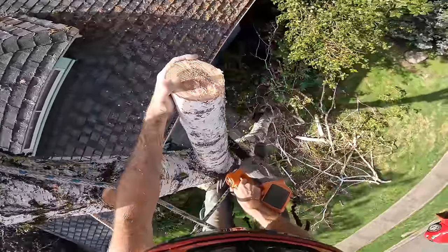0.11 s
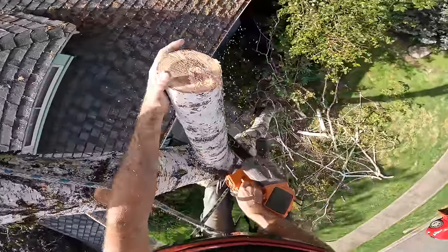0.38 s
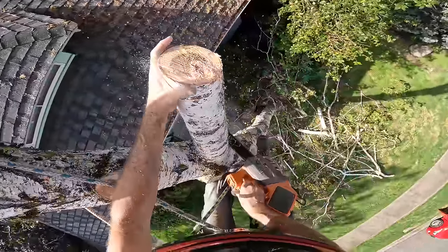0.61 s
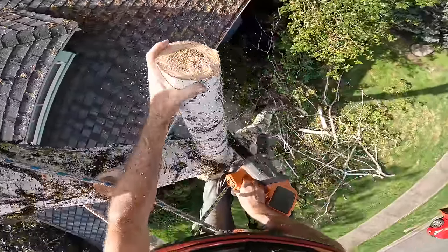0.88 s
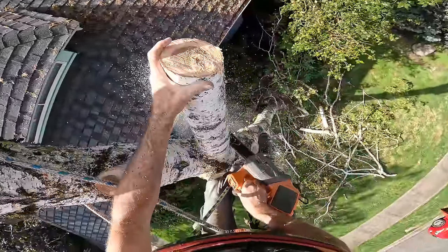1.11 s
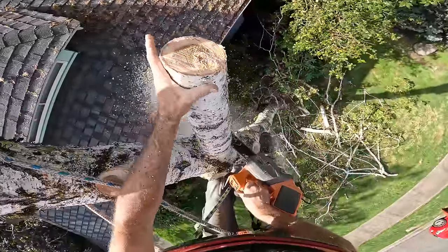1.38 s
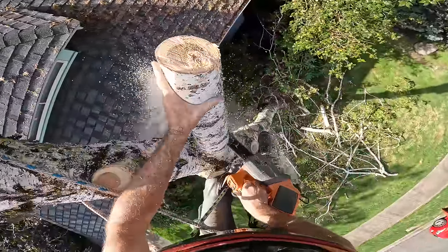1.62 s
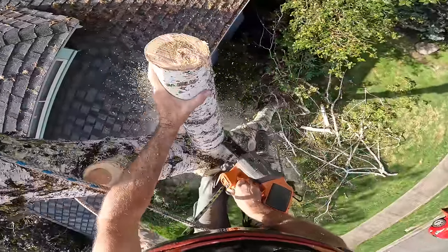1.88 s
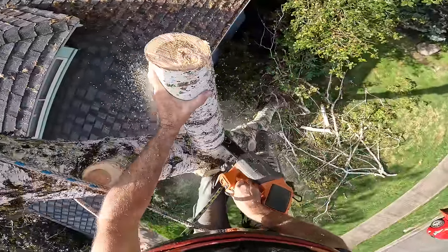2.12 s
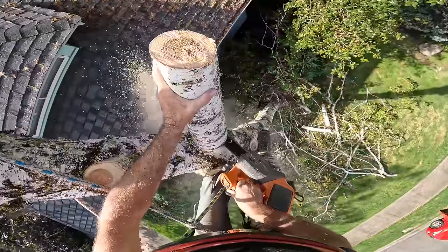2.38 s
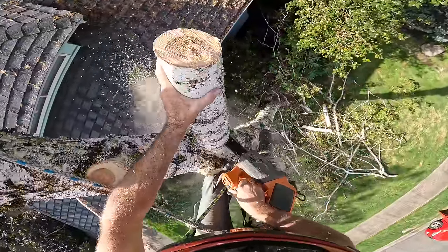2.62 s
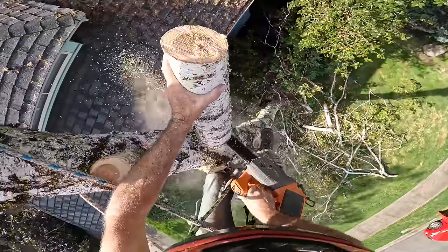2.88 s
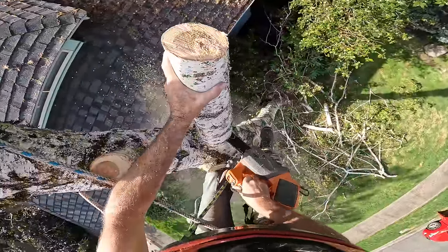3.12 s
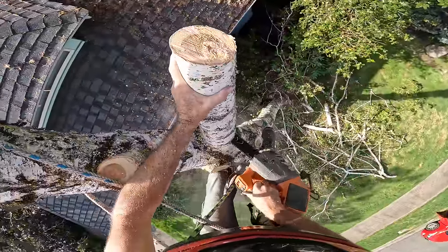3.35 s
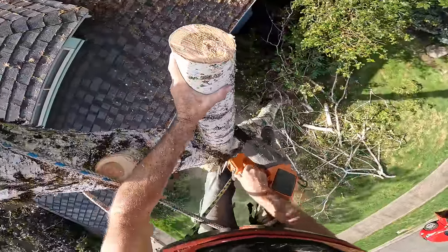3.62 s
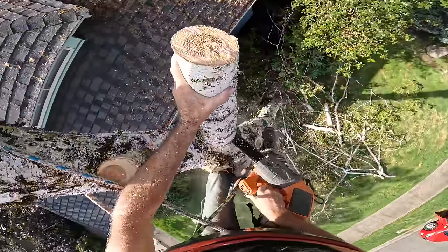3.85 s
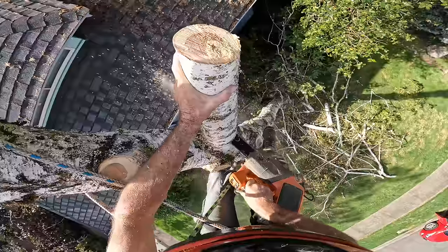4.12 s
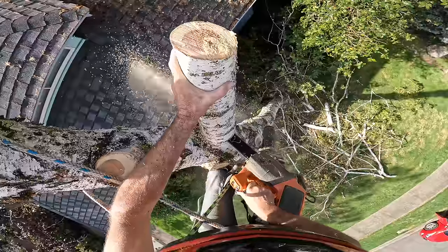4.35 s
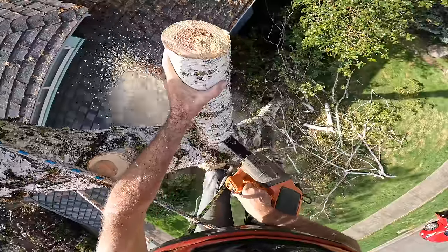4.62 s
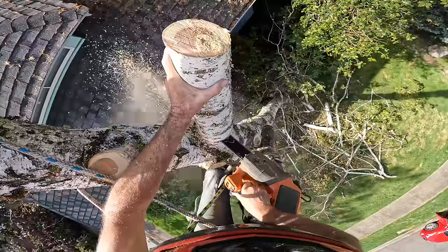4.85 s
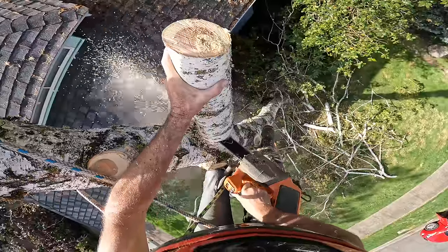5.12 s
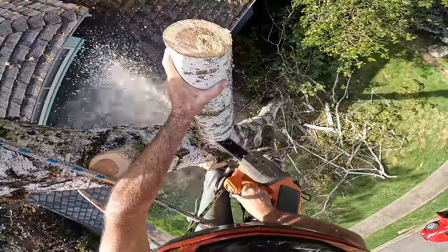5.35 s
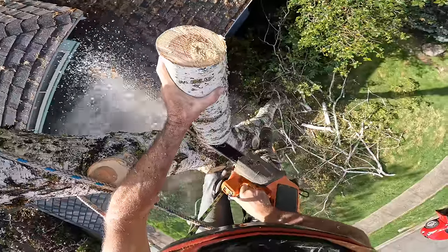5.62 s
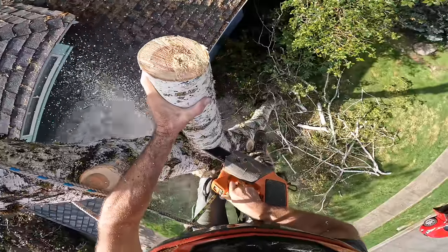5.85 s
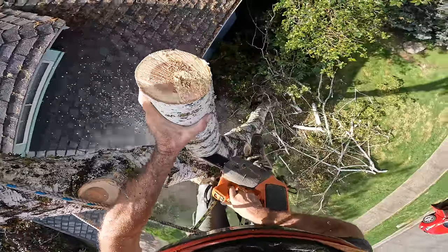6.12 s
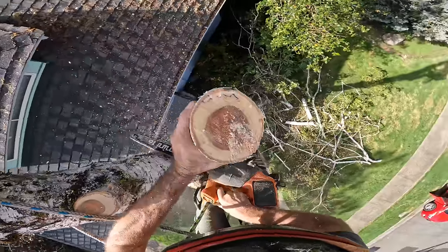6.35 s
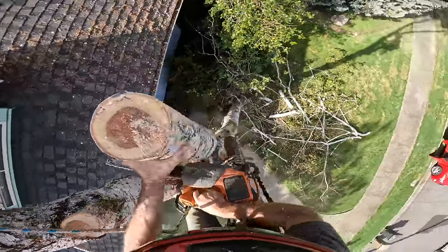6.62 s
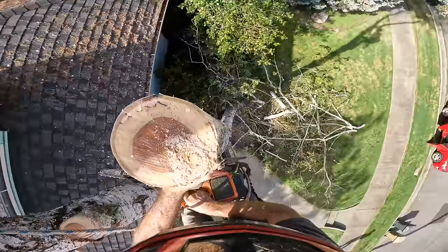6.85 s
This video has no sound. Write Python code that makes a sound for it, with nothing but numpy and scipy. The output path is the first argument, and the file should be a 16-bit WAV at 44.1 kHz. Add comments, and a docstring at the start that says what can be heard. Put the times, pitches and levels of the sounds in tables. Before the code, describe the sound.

Close electric saw surges through wood with a gritty high whine, pauses amid small gear clicks, cuts again, then spins free and winds down.

```python
"""A battery chainsaw, an arm's length below a head-worn camera, makes two cuts in a tree stem, then revs
almost free and coasts down. Shaft-order sines whine through the saw's housing; noise bursts, one per
sprocket tooth, become roar, rattle, bite and hiss. Slow swells of low noise buffet the microphone ports,
short dying noises are gear ticking in the pauses, and steady coloured noise is the hum of distant traffic."""
import sys
import numpy as np
from scipy import signal
from scipy.fft import rfft, irfft, next_fast_len
from scipy.io import wavfile
from scipy.ndimage import uniform_filter1d, map_coordinates

SR = 44100
rng = np.random.default_rng(int(sys.argv[2]) if len(sys.argv) > 2 else 0)


def volts_from_db(level):
    """Convert decibel levels to linear amplitude ratios."""
    exponent = np.asarray(level, float) / 20
    return 10 ** exponent


def put_to_file(sound):
    """Save the sound as 16-bit audio at rate SR, in the file named by the first command-line argument."""
    columns = np.atleast_2d(sound).T  # one column per channel
    safe = np.clip(columns, -1, 1)
    whole_steps = np.round(safe * 32767)
    wavfile.write(sys.argv[1], SR, whole_steps.astype(np.int16))


N = 307818
TEETH = 8  # on the sprocket

# how the saw and gear noises are shared between the two ports: f/Hz, likeness (1 = the same in both, 0 =
# unrelated)
STEREO_LIKENESS = [(300, 0.97), (700, 0.98), (2000, 0.995), (3200, 0.98), (3900, 1), (9500, 1), (10300, 1),
                   (12000, 0.1), (15000, 0)]


def unit(x):
    """Scaled to rms 1."""
    return x / np.sqrt(np.mean(x ** 2) + 1e-20)


def along(points, hz):
    """(Hz, value) points read on a log frequency axis."""
    f, v = np.transpose(points)
    return np.interp(np.log(hz + 1), np.log(f + 1), v)


def curves(rows):
    """One value per sample for each column after the time."""
    s, *cols = np.transpose(rows)
    return [np.interp(np.arange(N) / SR, s, c) for c in cols]


def wobble(rate):
    """A smooth random curve, rate knots a second."""
    knots = rng.standard_normal(int(N * rate / SR) + 4)
    return map_coordinates(knots, [np.arange(N) * rate / SR])


def filtered(x, response):
    """x times a response of frequency."""
    m = next_fast_len(N + 8192)
    return irfft(rfft(x, m) * response(np.fft.rfftfreq(m, 1 / SR)), m)[..., :N]


def closed(spectrum, hz):
    """Gain of a spectrum, silent a little outside its ends."""
    inside = (hz > .8 * spectrum[0][0]) * (hz < 1.2 * spectrum[-1][0])
    return volts_from_db(along(spectrum, hz)) * inside


def resonances(hz, modes, flat_db):
    """Gain of a set of resonances, their powers added over a weak flat path."""
    power = sum(volts_from_db(2 * db) / (1 + ((hz - c) / (w / 2)) ** 2) for c, w, db in modes)
    return np.sqrt(volts_from_db(2 * flat_db) + power)


def pair(source, gain, alike):
    """Two noises mixed to a stereo pair of rms 1 with the given likeness."""
    def mid_side_gain(hz):
        turn = np.arccos(np.clip(along(alike, hz), -1, 1)) / 2
        return gain(hz) * [np.cos(turn), np.sin(turn)]

    mid, side = filtered(source, mid_side_gain)
    return unit(np.array([mid + side, mid - side]))


def wind():
    """Turbulence makes lumpy low pressure on the ports, stronger on the right: a breeze with short puffs."""
    # breeze at the ports: t/s, relative level/dB
    breeze_rows = [(0, -30.5), (0.5, -50), (1.2, -34), (2.3, -41), (2.7, -44.5), (3.4, -42.5), (3.9, -28),
                   (4.3, -45), (5.3, -48), (6.1, -58), (6.7, -57), (6.98, -35)]
    # puffs on the ports: t/s, relative deep level/dB, relative flutter level/dB, time from peak to 1/e /s
    puff_rows = [(0.11, -24, -16.5, 0.018), (0.194, -32, -15.5, 0.023), (0.893, -20, -26, .015),
                 (0.99, -20, -28.5, 0.06), (1.125, -23, -45, 0.015), (1.26, -29, -40.5, 0.025),
                 (1.351, -31, -22, 0.063), (1.442, -37, -26, .02), (1.5, -23, -25.5, 0.017),
                 (1.773, -31, -41, 0.0302), (2.059, -23, -21.5, 0.027), (2.122, -30, -27, .02),
                 (2.19, -31, -45, 0.017), (2.255, -24, -26, 0.017), (2.392, -36, -38, 0.031),
                 (3.11, -31, -35, 0.016), (3.495, -31, -45, .02), (3.642, -33, -45, 0.01),
                 (3.731, -40, -31, 0.038), (3.857, -22, -33, 0.037)]
    # colour of the deep buffeting: f/Hz, relative level/dB
    deep_colour = [(20, 2), (32, 4.5), (60, -4), (90, -22)]
    # colour of the flutter: f/Hz, relative level/dB
    flutter_colour = [(45, -4), (75, 2.5), (110, 0), (180, -9.5), (300, -31)]

    t = np.arange(N) / SR
    breeze_db, = curves(breeze_rows)
    puffs = sum(volts_from_db([[deep_db], [flutter_db]]) * np.exp(-((t - s) / length) ** 2)
                for s, deep_db, flutter_db, length in puff_rows)
    deep = volts_from_db(breeze_db - 0.5 + 2.1 * wobble(14)) + 0.51 * puffs[0]
    # the flutter hardly follows the breeze
    flutter_db = 0.098 * (breeze_db - breeze_db.mean()) - 43.5 + 3.6 * wobble(14) + 0.58 * wobble(30)
    flutter = volts_from_db(flutter_db) + 0.74 * puffs[1]

    def gust(spectrum):
        noise = rng.standard_normal((2, N))
        return pair(noise, lambda hz: closed(spectrum, hz), [(30, 0.99), (200, 0.98)])

    return (deep * gust(deep_colour) + flutter * gust(flutter_colour)) * volts_from_db([[-2.7], [2.4]])


def street():
    """Far traffic, many sources blurred into one soft hum with a hump near 1 kHz."""
    # traffic in the distance: t/s, relative level/dB
    street_rows = [(0.0, -41), (0.17, -47.5), (0.3, -39.5), (3.04, -48), (3.18, -48.5), (3.75, -45),
                   (3.85, -37.5), (6.88, -45.5)]
    # colour of the traffic: f/Hz, relative level/dB
    traffic_colour = [(120, -15), (200, -1), (326, -8.5), (521, -8), (659, -11.5), (818, -12), (929, -3.5),
                      (2600, -27), (3410, -27), (4090, -26), (5660, -29.5), (12100, -47), (15000, -69)]

    level_db, = curves(street_rows)
    hum = pair(rng.standard_normal((2, N)), lambda hz: closed(traffic_colour, hz),
               [(300, 0.98), (2000, .97), (5000, 0.73), (12000, 0.23)])
    return volts_from_db(level_db + 3.5 + 0.23 * wobble(8.1)) * hum


def gear():
    """Ticks and scuffs of gear: each contact is a short dying noise in three colours."""
    # ticks: t/s, relative level of the click/dB, dull part over click/dB, bright part over click/dB
    tick_rows = [(0.043, -29, 13, 2), (0.0608, -20, 3, -10), (0.077, -26.5, -3, 7),
                 (0.1006, -36.5, -16.5, 8), (0.1663, -18, 10.5, -5), (0.2164, -21, 9, -7),
                 (0.2317, -16.5, 7, -15), (0.267, -23, 10, -11), (3.0974, -39, 10, -14),
                 (3.191, -33, 8, -7), (3.246, -31, 6, -8), (3.266, -18, 2, -2), (3.343, -26.5, -8, -6),
                 (3.361, -28, 1, -2), (3.459, -24.5, -5, -15), (3.6012, -37, 1, -4),
                 (3.662, -22.5, 6, -3.5), (3.7404, -38, 17, -16), (3.8062, -20, -7, -9),
                 (3.8307, -21.5, -12, -3), (3.845, -28, 2, 5), (6.933, -30, 4, -5.5)]
    # colours of the three parts: f/Hz, relative level/dB
    dull_colour = [(250, -15), (450, -1.5), (1100, -10.5), (1600, -11)]
    click_colour = [(1000, 5.5), (1600, -8.5), (3300, -2.5), (4500, -39)]
    bright_colour = [(3500, -4), (5200, 2), (8000, -10), (14000, -25)]
    t60_s, rise_s = 0.028, 0.0029

    t = np.arange(SR // 8) / SR
    shape = volts_from_db(-5 - 60 * t / t60_s) * (1 - np.exp(-t / rise_s))
    envelope = np.zeros((3, N + len(t)))
    for s, db, dull_db, bright_db in tick_rows:
        levels = volts_from_db([[db + dull_db], [db], [db + bright_db]])
        envelope[:, round(s * SR):][:, :len(t)] += levels * shape
    colours = [pair(rng.standard_normal((2, N)), lambda hz: closed(c, hz), STEREO_LIKENESS)
               for c in (dull_colour, click_colour, bright_colour)]
    return sum(e[:N] * c for e, c in zip(envelope, colours))


def speed():
    """Tooth rate: driven while the trigger is held, then slowed by drag and rubbing."""
    # chain drive, one list for each pull of the trigger: t/s, sprocket tooth rate f/Hz
    drive = [
        [(0.3, 278), (0.36, 521.7), (0.415, 911), (0.44, 1040), (0.47, 1107), (0.53, 968), (0.62, 644.6),
         (0.69, 548), (0.75, 652), (0.82, 865), (0.9, 923), (0.97, 992), (1.06, 809), (1.18, 917.6),
         (1.255, 924), (1.37, 1074), (1.425, 1209), (1.49, 1306), (1.575, 1114), (1.72, 889), (1.765, 895.5),
         (1.82, 802), (1.885, 970), (1.99, 1055), (2.105, 1312), (2.2, 1354), (2.35, 1504), (2.495, 1602),
         (2.58, 1603), (2.66, 1684), (2.72, 1662), (2.77, 1678), (2.79, 1608)],
        [(3.86, 251.3), (3.93, 733.5), (4.07, 1766), (4.1, 1630), (4.16, 1636), (4.24, 1452), (4.29, 1388),
         (4.345, 1460), (4.385, 1590), (4.465, 1499), (4.56, 1451), (4.675, 1303), (4.73, 1181), (4.81, 1088),
         (4.84, 1111), (4.94, 1248), (5.0, 1264), (5.055, 1337), (5.145, 1342), (5.225, 1399), (5.295, 1380),
         (5.375, 1406), (5.435, 1373), (5.515, 1401), (5.57, 1394), (5.615, 1453), (5.74, 1738), (5.795, 1437)],
        [(6.088, 635), (6.135, 1137), (6.19, 1614)],
    ]
    # trigger let go after each pull, the kerf braking harder than air: drag [1/s], rubbing [Hz/s]
    coast_rows = [(4.3, 1600), (2.02, 800), (1.85, 740)]
    rest_hz = 40  # lowest tooth rate

    t = np.arange(N) / SR
    tooth_hz = np.full(N, float(rest_hz))
    for rows, (drag, rub) in zip(drive, coast_rows):
        s, hz = np.transpose(rows)
        since_release = np.maximum(t - s[-1], 0)
        coast = (hz[-1] + rub / drag) * np.exp(-drag * since_release) - rub / drag
        after_start = np.where(t < s[-1], np.interp(t, s, hz), np.maximum(coast, rest_hz))
        tooth_hz = np.where(t < s[0], tooth_hz, after_start)
    return tooth_hz


def whine(tooth_hz, depth, loud_db):
    """Shaft orders as slightly unsteady lines that swell as they cross a resonance of the housing."""
    # multiples of the shaft rate that sound; order 8 is the tooth rate
    orders = [2, 4, 7, 8, 9, 12, 14, 16, 24, 32]
    # each order: relative level running free/dB, more at full depth/dB, slow swelling/dB
    order_rows = [(-19.5, 2.5, 4), (-7.5, -5, 2.5), (-26, 3.5, 7), (0.56, -0.2, 1.03), (-18.5, 5.5, 3),
                  (-14.5, -7, 3.5), (-22.5, 13.5, 2.5), (-6, 2.8, 1.9), (-11, -4, 4), (-15, 1.5, 2.5)]
    # what housing and bar let out: f/Hz, level running free/dB, level with the bar held in the wood/dB
    housing = [(302, -56, -53), (375, -39, -22), (463, -26.5, -18.5), (540, -29.5, -33), (627, -22, -38),
               (678, -21, -28.5), (830, -33.5, -24), (970, -21, -22), (1090, -25, -26.5),
               (1389.8, -24, -32.5), (1670, -23.5, -28), (1884, -28, -34), (2180, -17, -21),
               (2400, -23, -20.5), (2690, -26, -19.5), (2855, -36, -23), (3340, -30.5, -18.5),
               (3470, -23, -31), (3660, -13, -19), (4050, -31, -24), (4170, -23, -15), (4412, -31, -22),
               (5350, -26, -12.5), (6130, -31, -21), (7003, -50, -52)]
    slow_hz, knock_per_halving_db = 475, 9.5

    unsteady_hz = tooth_hz * (1 + 0.002037 * wobble(40) + .0015 * wobble(150))
    shaft = 2 * np.pi * np.cumsum(unsteady_hz) / SR / TEETH  # radians
    # the chain whips while its speed changes
    whip_db = np.clip(0.5 * np.abs(np.gradient(np.log(tooth_hz))) * SR, 0, 3.2)
    # below slow_hz each link seats with a second knock, which lifts the orders above the tooth rate
    knock_db = knock_per_halving_db * (1 - depth) * np.clip(np.log2(slow_hz / tooth_hz), 0, .6)
    hz, free_db, held_db = np.transpose(housing)

    lines = 0
    for k, (db, deep_db, swell_db) in zip(orders, order_rows):
        line_hz = k * tooth_hz / TEETH
        housing_db = (1 - depth) * np.interp(line_hz, hz, free_db) + depth * np.interp(line_hz, hz, held_db)
        level_db = loud_db + housing_db + db + deep_db * depth + swell_db * wobble(11)
        level_db = level_db + whip_db * (wobble(35) - .9) + knock_db * (k > TEETH) + 1.7 * wobble(45)
        phase = k * shaft + 0.16 * np.sqrt(k) * wobble(180) + rng.uniform(0, 2 * np.pi)
        lines = lines + np.sqrt(2) * volts_from_db(level_db) * np.sin(phase)
    return lines, shaft


def saw():
    """Each tooth and cutter lets go a burst of noise, uneven in size; links ring the bar, cutters tear wood."""
    # the bar in the stem: t/s, depth (0 free, 1 full), relative level/dB
    cut = [(0.3, 0.2, -13), (0.32, 0, 0.5), (0.345, 0.86, 4.5), (0.45, 0, 1), (0.55, 0.46, 2.3),
           (0.7, 0.55, 2.5), (0.9, 0.64, 1), (1.2, 0.8, 0.5), (1.5, .8, 0.5), (1.75, 0.9, 0), (2.0, 1, 0),
           (2.3, 0.78, 0.2), (2.76, 1, -1), (2.83, .35, 1.5), (2.9, 0.7, 1), (2.96, 1, -0.5),
           (3.0, 0.93, -5.5), (3.035, 0.97, -34.5), (3.845, .5, -27), (3.874, 0.2, 2), (3.887, 0.9, 3),
           (3.94, 0.19, 2.5), (4.08, 0.2, 1), (4.2, 0.23, 2.5), (4.33, 0.94, 0.5), (4.41, 0.29, 1.5),
           (4.47, 0.99, -0.1), (4.55, .8, 0.5), (4.85, 0.89, 0), (5.1, 1, -1.5), (5.5, 0.85, -0.5),
           (5.66, 0.61, 1), (5.75, 0.14, 1), (6.08, 0.05, 0), (6.13, 0.17, 2), (6.25, 0, 0), (6.5, 0.01, 0),
           (6.6, 0.01, -1.4), (6.7, 0, 0.5), (6.82, 0.05, -8.5), (6.89, 0, -20), (6.93, 0.07, -54)]
    # chain noises: relative level free at 1000 teeth a second/dB, more at full depth/dB, per speed doubling/dB
    roar_law = (-33.5, 5.33, -1.1)
    rattle_law = (-23, -7.5, 1.4)
    bite_law = (-33.5, 4.98, 3.6)
    hiss_law = (-35, -0.55, 3.76)
    # resonances of saw body and bar: f/Hz, width/Hz, relative level/dB
    saw_modes = [(402, 250, 4), (735, 50, -2), (970, 200, 5), (1750, 780, 2.5), (2150, 470, -15),
                 (2700, 290, -6), (3520, 290, 5), (4390, 1000, -4), (5400, 740, 9), (10800, 990, 6)]
    # guide bar ringing under the links, before sharpening: f/Hz, width/Hz, relative level/dB
    bar_modes = [(684, 78, 4), (1190, 370, 0.5), (2370, 530, 2), (2670, 310, 2.5), (3400, 200, -10)]
    # colours of roar, bite and hiss: f/Hz, relative level/dB
    roar_colour = [(150, -15), (300, -6), (450, -0.5), (900, -8.5), (1400, -2), (2500, -30)]
    bite_colour = [(700, -7), (1200, -2), (2000, 2), (3500, 2.5), (4600, 1), (5500, -2.5), (6500, -22),
                   (8000, -23)]
    hiss_colour = [(3000, -46), (5000, -12.5), (5450, -6), (5900, -2), (8200, -10.5), (10200, -9),
                   (11500, -11), (12100, -12.5), (12700, -15.5), (14000, -20), (14700, -29), (15100, -40)]
    # sawdust thrown out: t/s, added hiss level/dB
    spray = [(2.8, 1.1), (4.2, 0.7), (4.95, 4.4), (5.1, 5.5), (5.68, 3.5), (5.78, 2), (6.9, 1.2)]

    tooth_hz = speed()
    depth, loud_db = curves(cut)
    depth = np.clip(depth, 0, 1)
    roar_db, rattle_db, bite_db, hiss_db = [
        loud_db + db + deep_db * depth + fast_db * np.log2(tooth_hz / 1000)
        for db, deep_db, fast_db in (roar_law, rattle_law, bite_law, hiss_law)]
    spray_db, = curves(spray)
    lines, shaft = whine(tooth_hz, depth, loud_db)

    tooth = (shaft * TEETH / (2 * np.pi)).astype(int)
    luck = rng.standard_normal(N)[tooth]  # one random size per link
    slap = volts_from_db(2.3 * luck)  # loose links strike the bar far more unevenly
    cutters = 1 + 0.017 * np.cos(2 * shaft)  # one on every fourth link
    gate = volts_from_db(1.5 * luck) * (1 + 0.26 * np.cos(TEETH * shaft)) * cutters

    def layer(gain, extra=1):
        return pair(extra * gate * rng.standard_normal((2, N)), gain, STEREO_LIKENESS)

    roar = layer(lambda hz: closed(roar_colour, hz) * resonances(hz, saw_modes, flat_db=-13))
    roar = volts_from_db(roar_db + 1.85 * wobble(25)) * roar
    # the power sharpens the bar's resonances
    rattle = layer(lambda hz: resonances(hz, bar_modes, flat_db=-31) ** 1.24, slap)
    rattle = volts_from_db(rattle_db - 2.0 + 1.35 * wobble(30)) * rattle
    bite = layer(lambda hz: closed(bite_colour, hz) * np.sqrt(resonances(hz, saw_modes, flat_db=-13)))
    bite = volts_from_db(bite_db + 4.5 + 0.43 * wobble(30)) * bite
    hiss = layer(lambda hz: closed(hiss_colour, hz))
    hiss = volts_from_db(hiss_db + spray_db + 2.5 + 0.62 * wobble(45) + 1.4 * wobble(5.3)) * hiss
    return lines + roar + rattle + bite + hiss


def scene():
    """All sources at the camera; its gain control turns the far traffic down under the saw."""
    loud = saw()
    effort = np.sqrt(np.abs(uniform_filter1d(loud[0] ** 2, SR // 20)))  # rms over 50 ms
    far = street() / (1 + effort / volts_from_db(-19))
    return loud + wind() + far + gear()


def roll_off(x):
    """The treble ends steeply here."""
    return signal.sosfilt(signal.butter(12, 15570, fs=SR, output="sos"), x)


def record(dry):
    """The camera's microphones: peaks are softly clipped and the two ports differ in colour."""
    # difference between the microphone ports: f/Hz, left over right/dB
    port_rows = [(40, -1), (120, 0), (300, -0.9), (700, -3), (1300, -2), (3000, -1.7), (3900, -0.2),
                 (7000, 0.3), (9500, 1), (10300, 5), (15000, 3.2)]
    top_hz = 15200  # nothing passes the ports' filter above this

    clipped = dry / (1 + np.abs(dry / 0.47) ** 4) ** (1 / 4)

    def port_gain(hz):
        return volts_from_db(along(port_rows, hz) * np.array([[.5], [-.5]])) * (hz < top_hz)

    ports = filtered(clipped, port_gain)
    return roll_off(ports)


dry = scene()
out = record(dry)
put_to_file(out)
```